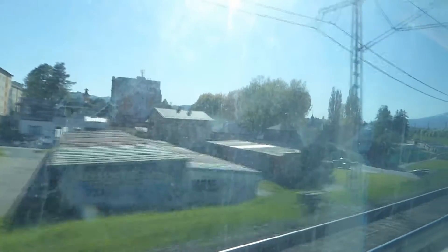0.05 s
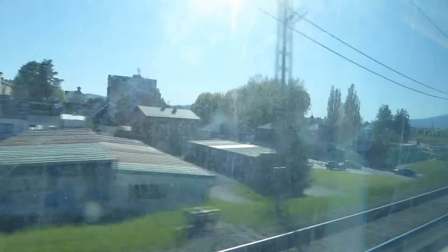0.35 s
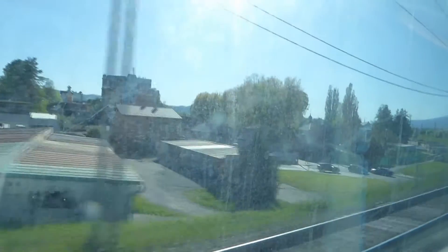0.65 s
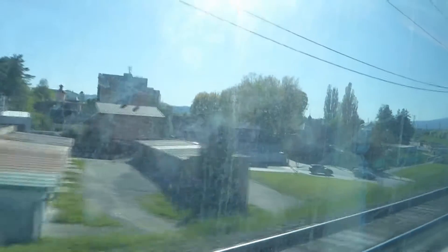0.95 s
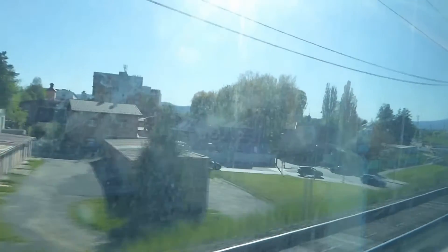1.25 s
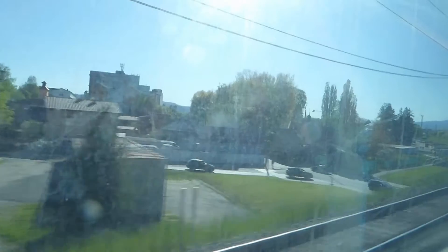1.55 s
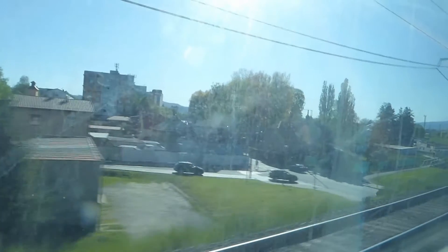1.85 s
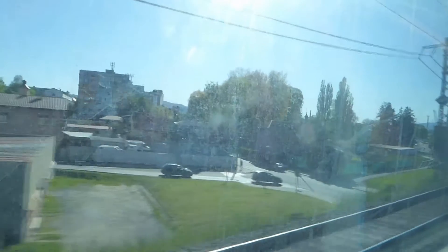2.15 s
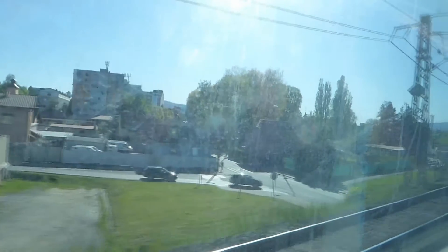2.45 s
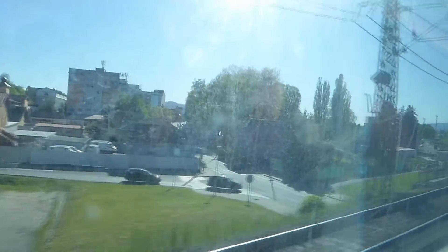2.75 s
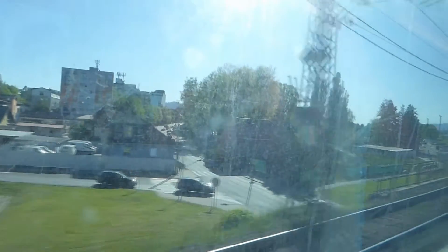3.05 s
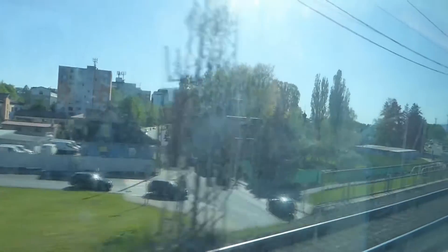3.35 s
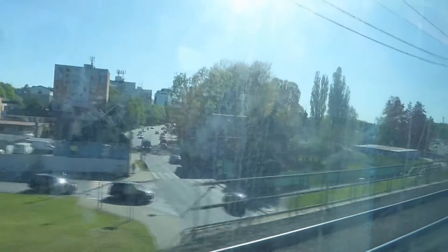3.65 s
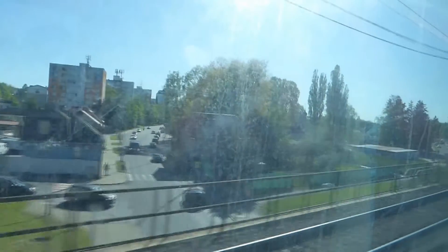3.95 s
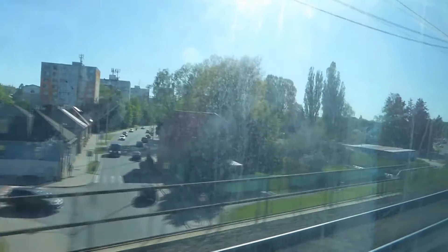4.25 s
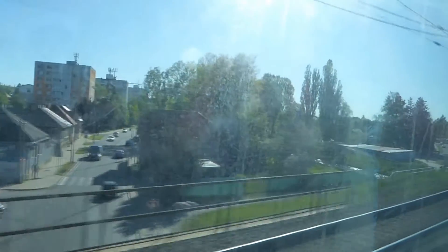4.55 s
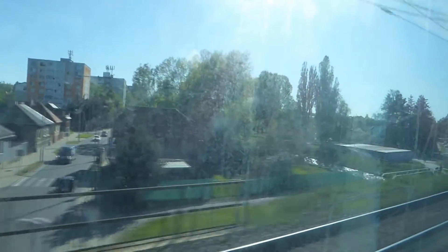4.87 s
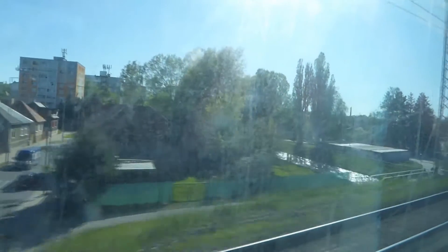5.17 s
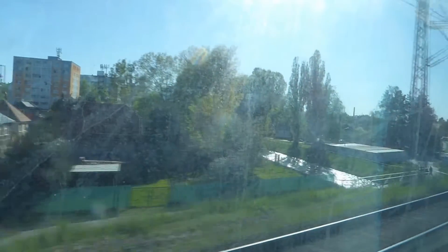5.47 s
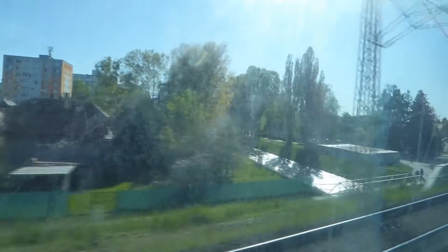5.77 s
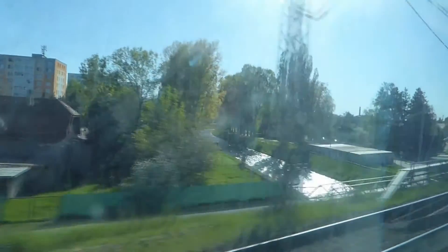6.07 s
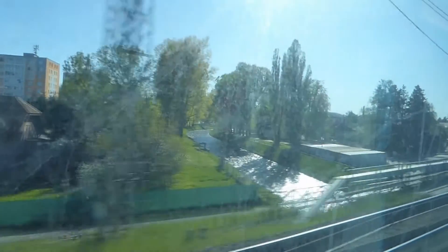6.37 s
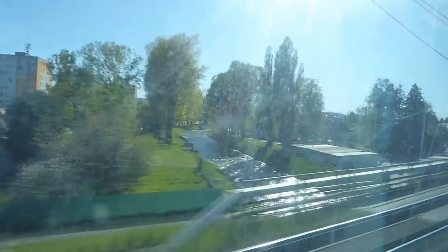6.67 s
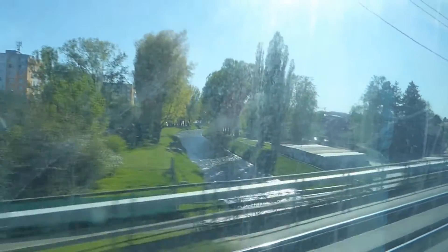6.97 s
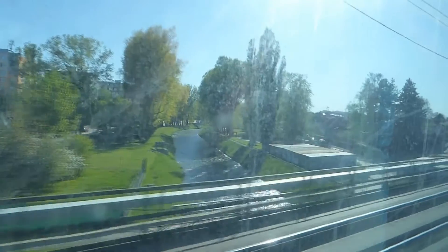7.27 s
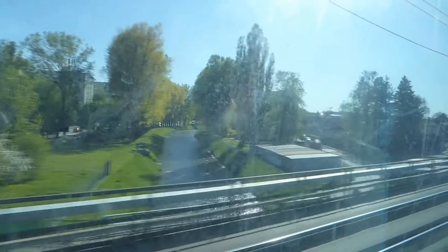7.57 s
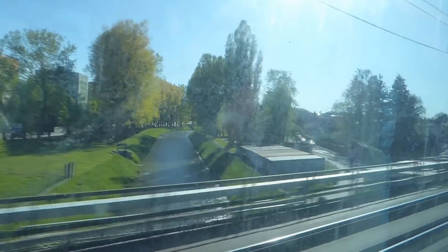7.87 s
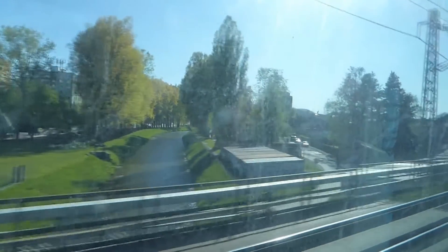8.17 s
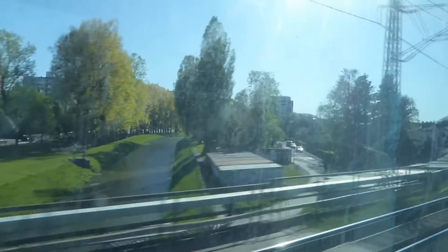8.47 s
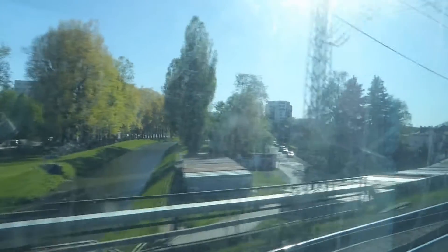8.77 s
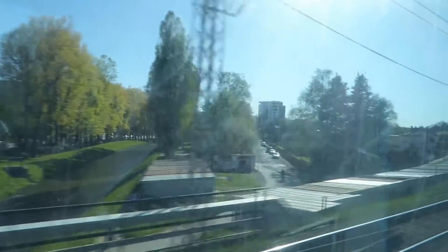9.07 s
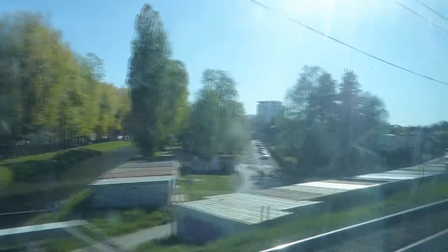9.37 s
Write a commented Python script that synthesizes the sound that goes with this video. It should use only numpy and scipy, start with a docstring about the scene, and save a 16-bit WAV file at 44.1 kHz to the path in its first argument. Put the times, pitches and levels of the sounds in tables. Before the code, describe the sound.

Inside an electric passenger train at steady speed, wheels rumble through the floor under an even ventilation hiss and a slowly pulsing fan hum. A trim panel creaks briefly at the start, then the wheels thump softly over rail joints. A nearby latch clacks shut about a third of the way in, followed by a few more muffled knocks. Loose fittings tick faintly. Heard in stereo from a window seat.

```python
"""Wheels rumble through the body of an electric train at steady speed, heard in stereo from a window seat.
Ventilation hisses above the rumble, and two fans at almost the same speed hum and beat slowly.
Bogies thump over rail joints, a trim panel creaks as the car shakes, and a latch clacks shut nearby.
Further back the electrical gear hums, two motors whine thinly and loose fittings tick faintly."""
import sys
import numpy as np
from scipy import signal
from scipy.fft import rfft, irfft, next_fast_len
from scipy.io import wavfile
from scipy.ndimage import uniform_filter1d

SR = 44100
rng = np.random.default_rng(int(sys.argv[2]) if len(sys.argv) > 2 else 0)


def file_out(sig):
    """Save sig as 16-bit WAV at sys.argv[1]."""
    # one column per channel
    cols = np.atleast_2d(sig).T
    # limit, then scale
    lim = np.clip(cols, -1, 1)
    pcm = np.round(lim * 32767).astype(np.int16)
    wavfile.write(sys.argv[1], SR, pcm)


N = 415422
T = np.arange(N) / SR
SIDES = np.array([[1], [-1]])  # left, right

# stereo image at the seat (f/Hz, side minus mid/dB, left minus right/dB)
IMAGE = [(60, -25, -0.4), (200, -27, -1), (400, -25.5, -2), (704, -8.5, -3.5), (1280, -2, -1.5),
         (2400, -3, 1), (8000, -5.5, 0.7), (15000, -9, .3)]


def rolling(crossover_hz=450, flutter_db=0.48):
    """Wheel roar from under the floor; its low rumble and the singing of the rails swell with the track."""
    # rolling noise through the floor (f/Hz, density/dB per Hz)
    floor_noise = [(20, -100), (44, -94), (54, -89), (66, -72.5), (82, -70.5), (120, -61), (200, -57.5),
                   (265, -63), (440, -60), (520, -69), (720, -73.5), (1000, -78.5), (1500, -93),
                   (4000, -118)]
    # air and panel resonances of the saloon (f/Hz, width/Hz, lift/dB)
    saloon_modes = [(65.4, 8, 4), (76, 10, -3), (150.9, 2.4, 6), (203, 8.4, 3.5), (358.7, 22, 4),
                    (379, 24, -4.5), (434, 48, 4), (516, 21, -0.5), (731, 29, -4), (830, 105, 3)]
    # swells as the track changes (t/s, rumble level/dB, rail level/dB)
    track = [(0.0, 1.5, 3), (0.6, 1, -0.1), (1.5, 0, 0), (3.35, 0.5, 0), (3.8, 1, 1.0), (4.38, 1.5, 0),
             (4.7, -0.1, -0.4), (6.15, 1.1, -1), (6.6, -2, -1), (7.1, -0.5, -1), (8.1, 0, 1.5),
             (9.4, -0.5, -0.5)]
    roar = diffuse(floor_noise, size=next_fast_len(N, True))
    hz = bins(roar)
    saloon = resonate(saloon_modes, hz)
    rail_share = 1 / (1 + (crossover_hz / hz) ** 8)
    times, rumble_db, rail_db = np.transpose(track)
    rumble = shape(roar, saloon * (1 - rail_share))[:, :N] * undb(np.interp(T, times, rumble_db))
    rail = shape(roar, saloon * rail_share)[:, :N] * undb(np.interp(T, times, rail_db))
    return (rumble + rail) * undb(flutter_db * walk(11))


def ventilation(flutter_db=0.3):
    """Air hisses evenly from the vents, coloured by the ducts."""
    # rush of the air (f/Hz, density/dB per Hz)
    air_noise = [(300, -103.5), (900, -84.5), (1500, -84.5), (2000, -90), (2700, -95), (3600, -96.5),
                 (3950, -97), (4350, -99), (5200, -100), (5700, -105), (5950, -101.5), (8200, -107),
                 (9900, -104), (12000, -110), (14500, -115), (15700, -120)]
    # resonances and hollows of the ducts (f/Hz, width/Hz, lift/dB)
    duct_modes = [(1380, 110, 3), (1500, 90, -1), (1697, 75, 3), (1790, 110, -1.5), (2290, 60, -0.5),
                  (2410, 30, 3.5), (2505, 80, -3), (2960, 200, -2), (3180, 150, 2), (3520, 170, -0.5),
                  (4003, 50, 4), (5650, 220, -0.5), (8100, 300, -0.5)]
    air = diffuse(air_noise, size=next_fast_len(N, True))
    return shape(air, resonate(duct_modes, bins(air)))[:, :N] * undb(flutter_db * walk(14))


def fans(shaft_hz=49.225, blades=8, turbulence=0.04, growth=0.98):
    """Two fans drift in and out of step, so the blade tone swells and sinks."""
    # moments of opposition; fan B gains one blade on fan A from each to the next (t/s)
    opposed = [-1, .57, 2.06, 3.79, 5.38, 6.87, 8.57, 10.1]
    # orders that sound (multiples of the shaft speed)
    orders = [2, 3, 8, 16, 32, 48]
    # strength of each order (fan A level/dB, fan B level/dB)
    levels = [(-53, -74), (-46, -67), (-37.6, -42.5), (-64, -53.5), (-89, -84), (-90, -78)]
    lead_turns = (np.interp(T, opposed, np.arange(len(opposed))) - 1.5) / blades
    out = 0
    for order, (a_db, b_db) in zip(orders, levels):
        beat = undb(a_db) + undb(b_db) * np.exp(2j * np.pi * order * lead_turns)
        both = beat * np.exp(2j * np.pi * order * shaft_hz * T)
        # the turbulent inflow shakes higher orders more
        unsteady = turbulence * (order / blades) ** growth
        out += abs(both) * tone(order * shaft_hz, np.angle(both), unsteady)
    return out


def rail_joints(attack_s=0.0036):
    """Each wheel drops into the joint with a knock, cushioned by the springs, and shakes the floor."""
    # wheels over joints and rough welds (t/s, level/dB, t60/s, brightness/dB per octave)
    impacts = [(1.061, -24, .16, 3.8), (1.081, -28.5, .18, 3), (1.118, -26, .27, .3), (1.231, -26, .4, -1),
               (3.715, -26, .25, -2.5), (4.055, -30.5, .4, -2.5), (4.24, -33, .35, -2.5),
               (6.1, -32, .18, 1), (7.09, -30.5, .25, -3)]
    # response of the floor to a wheel (f/Hz, level/dB)
    floor_response = [(30, -55), (70, -26), (150, 7.5), (290, 10), (500, -7), (850, -11), (1400, -28.5),
                      (2800, -43.5), (4200, -49), (7000, -72)]
    out, size = np.zeros((2, N)), SR // 2
    cushion = np.minimum(T[:size] / attack_s, 1)
    for s, db, t60, bright_db in impacts:
        knock = brighten(burst(floor_response, fade(t60, size)), bright_db, pivot_hz=254)
        add(out, s, undb(db) * knock * cushion)
    return out


def creaks(slip_hz=520, slip_t60=0.007, room_db=-27, room_t60=0.38, dulling_db_per_s=550):
    """At each shake a trim panel's edge cracks loose, then slips in a short run that grows duller."""
    # shakes of the car (t/s, level/dB, creak length/s, brightness/dB per octave)
    shakes = [(.132, -33.5, .008, 1), (.189, -32, .008, 1), (.2455, -32.5, .008, -1),
              (.294, -37.5, .005, 0), (.3015, -26, .006, 2.2), (.3085, -28, .002, -2.5),
              (.3595, -32.5, .005, 0)]
    # response of the panel (f/Hz, level/dB)
    panel = [(200, -28), (550, -8), (850, -1), (1050, 1), (1270, -7), (1500, -2), (1750, -6.5), (2000, -15),
             (2300, -11), (2900, -20), (3500, -16.5), (5000, -23.5), (9000, -36), (15000, -60)]
    out, size = np.zeros((2, N)), SR // 8
    decay = fade(slip_t60, size) + undb(room_db) * fade(room_t60, size)
    for s, db, length, bright_db in shakes:
        delays = np.r_[0, np.cumsum(rng.uniform(.7, 1.3, size=8))] / slip_hz
        slips = [burst(panel, decay) for _ in delays]
        for delay, slip in zip(delays[delays < length], slips):
            dulled = brighten(slip, bright_db - dulling_db_per_s * delay, pivot_hz=1310)
            add(out, s + delay, undb(db) * dulled[:, :size // 2])
    return out


def latch(detune=0.0027, spread_rad=0.56, ring_db=-2.5, body_db=-1, room_db=-13, snap_db=-33.5):
    """Close by, a latch snaps and bounces, the saloon answers dully, and the spring lets go with a click."""
    # contacts of the latch (t/s, level/dB, brightness/dB per octave)
    contacts = [(3.503, -34.5, 1), (3.5085, -38, -1), (3.5155, -35.3, -2)]
    # its ringing (f/Hz, level/dB, t60/s)
    modes = [(1573, 3, 0.095), (1940, -5, 0.13), (2355, -1, 0.13), (2570, -5, 0.18), (2810, -4, .15),
             (3239, -7, .17), (3299, -2.5, .17), (3500, -6, 0.16), (3770, -5, 0.17), (4800, -9, 0.098),
             (5200, -13, 0.09), (6260, -13, 0.093), (7009, -9, .1), (7450, -10, .09), (8850, -11, .08),
             (9750, -10, .08), (10115, -7.5, 0.08), (10780, -9, .08), (12800, -12, .06)]
    # dense, short rattle of its housing (f/Hz, level/dB)
    housing = [(400, -17), (950, -1.5), (1600, -2), (2400, -0.5), (3700, -2), (4200, -11), (7200, -12),
               (8200, -17.5), (10800, -7.5), (11800, -25), (14500, -23), (16000, -36)]
    # knock and bright snap of the first contact (f/Hz, level/dB)
    snap = [(300, -8), (650, 11), (1000, 15), (1400, 2), (3000, -15), (9000, -8), (10300, 2), (11500, -1),
            (12000, -10), (12800, 0), (13800, -10), (14500, -4), (15500, -25)]
    # the spring is let go (t/s, level/dB)
    releases = [(3.699, -48), (3.7125, -52)]
    # thin click of the spring (f/Hz, level/dB)
    spring = [(1000, -14), (3000, -2), (4300, -3), (4850, 3), (5400, -12), (7400, 2), (8600, -12),
              (10100, -7), (12700, -23), (13400, -4), (13900, -22), (16000, -35)]
    out, size = np.zeros((2, N)), SR // 2
    hz, mode_db, t60 = np.transpose(modes)[:, :, None]
    for s, db, bright_db in contacts:
        phase = 2 * np.pi * rng.random(hz.shape) + spread_rad * rng.standard_normal((2, *hz.shape))
        # the parts seat differently at each contact, which detunes their ringing
        seated_hz = hz * (1 + detune * rng.standard_normal(hz.shape))
        partials = undb(mode_db) * fade(t60, size) * np.sin(2 * np.pi * seated_hz * T[:size] + phase)
        ring = partials.sum(axis=1) / np.sqrt(np.sum(undb(mode_db) ** 2) / 2)
        body = burst(housing, fade(t60=0.13, size=size))
        room = brighten(burst(housing, fade(t60=0.42, size=size)), octave_db=-3)
        hit = undb(ring_db) * ring + undb(body_db) * body + undb(room_db) * room
        add(out, s, undb(db) * brighten(hit, bright_db)[:, :size // 2])
    add(out, contacts[0][0], undb(snap_db) * burst(snap, fade(t60=0.035, size=size)))
    for s, db in releases:
        add(out, s, undb(db) * burst(spring, fade(t60=0.14, size=size)))
    return out


def electrical_gear(waver_hz=16):
    """Transformer and pumps hum in the background; the inverter whines thinly."""
    # tones of the gear (f/Hz)
    pitches = [100, 150.92, 194.13, 649.2, 4833.5]
    # strength of each tone (level/dB, unsteady share)
    levels = [(-53.5, 0.2), (-48, 0.32), (-52, 0.63), (-74, 0.66), (-84, 1.3)]
    return sum(undb(db) * tone(hz, 2 * np.pi * (hz * T + rng.random()), unsteady, waver_hz)
               for hz, (db, unsteady) in zip(pitches, levels))


def motor_whine(hz=2416.68, beat_hz=2.275, in_step_s=5.05, first_db=-72.5, second_relative_db=-5):
    """Two motors whine almost in unison and throb a little unevenly as they drift in and out of step."""
    lead_cycles = beat_hz * (T - in_step_s) + 0.075 * walk(2.1)
    both = 1 + undb(second_relative_db) * np.exp(2j * np.pi * lead_cycles)
    return undb(first_db) * abs(both) * tone(hz, 2 * np.pi * hz * T + np.angle(both), unsteady=0.098)


def fittings(t60=0.12, skirt_db=-14, faint_per_s=0.59, faint_db=-67, faint_hz=7500, scatter_db=2):
    """Loose fittings touch and ring briefly: a few clearly, others faintly at uneven intervals."""
    # the clearest ticks (t/s, level/dB, centre f/Hz, width/octaves)
    clear_ticks = [(.909, -55.5, 9000, 1), (1.083, -54, 4500, .25), (1.149, -60, 8500, 1),
                   (1.155, -51.5, 3830, .3), (1.162, -50, 1700, .7), (3.004, -59, 6500, 1),
                   (4.18, -60, 6000, 1), (5.48, -52, 2700, .7), (7.822, -63, 4500, 1)]
    out, chance = np.zeros((2, N)), rng.uniform(-1, 1, size=(16, 3))
    times = np.cumsum(1 + chance[:, 0] / 2) / faint_per_s
    faint_ticks = [(s, faint_db + scatter_db * strength, faint_hz * (1 + pitch / 10), 1)
                   for s, (_, strength, pitch) in zip(times, chance) if s < T[-1]]
    for s, db, hz, width in clear_ticks + faint_ticks:
        colour = [(hz * 2. ** (step * width), skirt_db * abs(step)) for step in range(-3, 4)]
        add(out, s, undb(db) * burst(colour, fade(t60, size=SR // 4)))
    return out


def tone(hz, phase, unsteady, waver_hz=7):
    """A hum across the saloon wavers with shifting reflections, a high one differently left and right."""
    mid, side = (walk(waver_hz) + 1j * walk(waver_hz) for _ in range(2))
    field = 1 + unsteady * (mid + SIDES * side * undb(read(IMAGE, hz))) / np.sqrt(2)
    balance = undb(SIDES * read(IMAGE, hz, column=2) / 2)
    return np.sqrt(2) * (field * np.exp(1j * phase)).real * balance


def diffuse(points, size, envelope=1):
    """Noise of a given density: the bass is alike at both microphones, the treble comes from all round."""
    padding = next_fast_len(size + 2048, True) - size
    noise = rng.standard_normal((2, size)) * envelope * np.sqrt(SR / 2)
    mid, side = np.pad(noise, ((0, 0), (0, padding)))
    hz = bins(mid)
    pair = mid + SIDES * shape(side, undb(read(IMAGE, hz)))
    balance_db = SIDES * read(IMAGE, hz, column=2) / 2
    return shape(pair, undb(read(points, hz) + balance_db))[:, :size]


def burst(points, envelope, attack_s=0.001):
    """Coloured noise whose rms follows a decay after a short attack."""
    noise = diffuse(points, size=len(envelope), envelope=envelope)
    attack = np.minimum(T[:len(envelope)] / attack_s, 1)
    return noise * np.sqrt(np.mean(envelope ** 2) / np.mean(noise ** 2)) * attack


def brighten(x, octave_db, pivot_hz=3000):
    """Tilt the spectrum about a pivot: upward for a harder contact, downward for a duller sound."""
    octaves = np.log2(np.maximum(bins(x) / pivot_hz, 1 / 3))
    return shape(x, undb(octave_db * octaves))


def resonate(modes, f):
    """Gain of a set of resonances at the frequencies f."""
    return undb(sum(db / (1 + (2 * (f - hz) / width) ** 2) for hz, width, db in modes))


def walk(rate_hz):
    """Random levels joined smoothly, with a spread near 1."""
    size = int(SR / rate_hz)
    knots = rng.standard_normal(N // size + 3)
    joined = np.interp(np.arange(N) / size + rng.random(), np.arange(len(knots)), knots)
    return 1.14 * uniform_filter1d(joined, size // 2)


def undb(db):
    """Decibels to gain."""
    return 10 ** (np.asarray(db) / 20)


def bins(x):
    """Frequencies of the spectrum of x."""
    return np.maximum(np.fft.rfftfreq(x.shape[-1], 1 / SR), 1)


def read(points, hz, column=1):
    """A column of a frequency table, joined by lines on a log axis."""
    table = np.array(points, float)
    return np.interp(np.log(hz), np.log(table[:, 0]), table[:, column])


def shape(x, gain):
    """Filter x with a gain for each frequency."""
    return irfft(rfft(x) * gain, x.shape[-1])


def fade(t60, size):
    """Exponential decay, 60 dB in t60 seconds."""
    return np.exp(-np.log(1000) * T[:size] / t60)


def add(out, s, sound):
    """Mix a sound in at time s."""
    start = max(int(s * SR), 0)
    out[:, start:start + sound.shape[1]] += sound[:, :N - start]


def scene():
    """Everything as it reaches the microphones at a window seat."""
    steady = rolling() + ventilation() + fans() + electrical_gear() + motor_whine()
    return steady + rail_joints() + creaks() + latch() + fittings()


def record(dry, cutoff_hz=15400):
    """The recorder cuts the top steeply."""
    return signal.sosfilt(signal.ellip(10, .1, 80, cutoff_hz, fs=SR, output="sos"), dry)


dry = scene()
out = record(dry)
file_out(out)
```